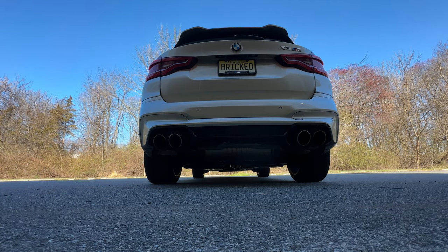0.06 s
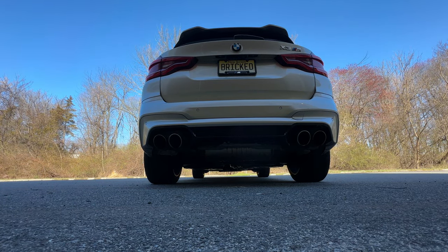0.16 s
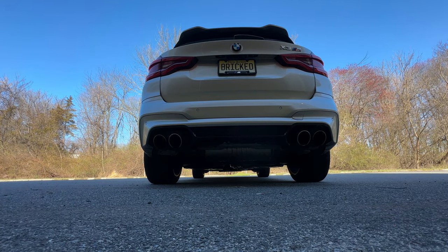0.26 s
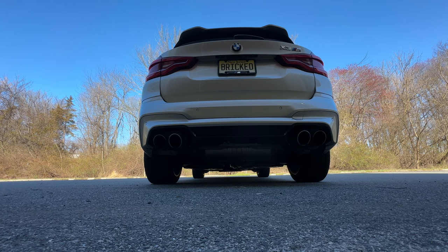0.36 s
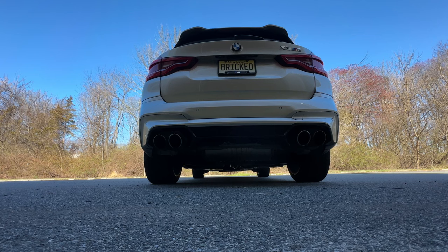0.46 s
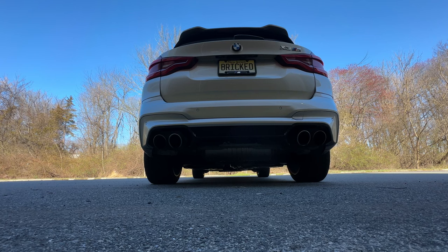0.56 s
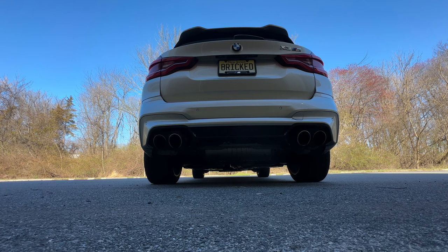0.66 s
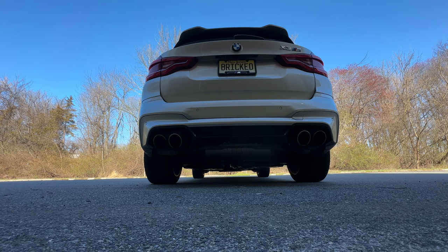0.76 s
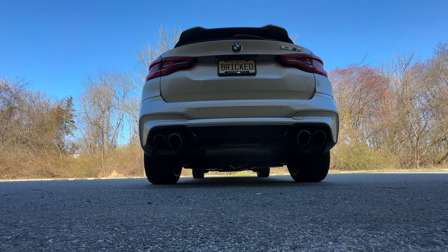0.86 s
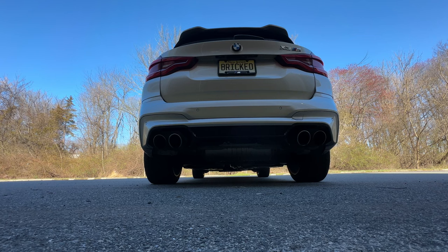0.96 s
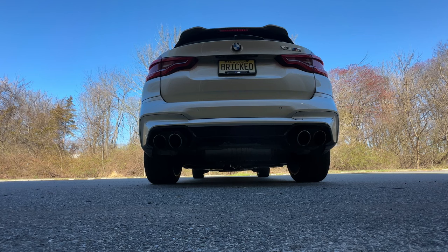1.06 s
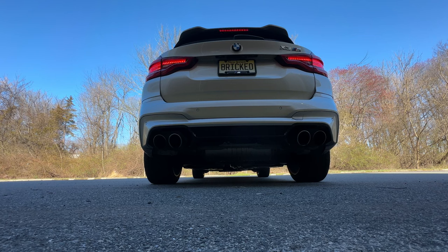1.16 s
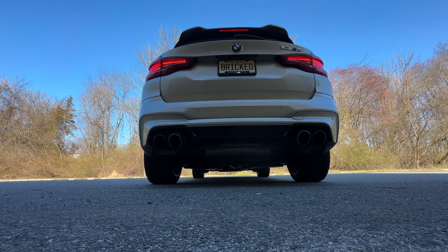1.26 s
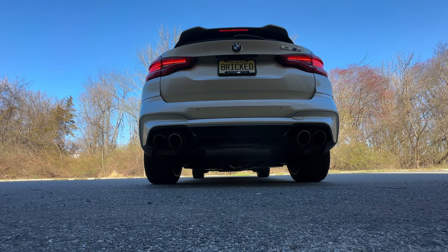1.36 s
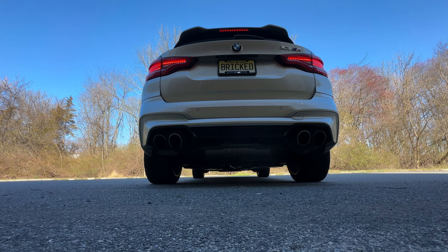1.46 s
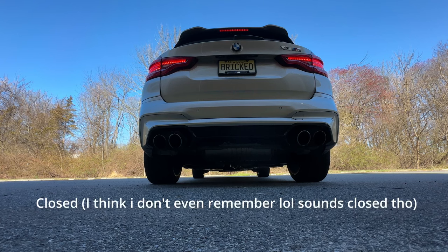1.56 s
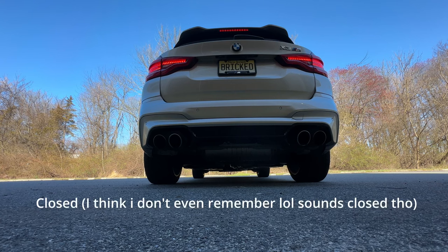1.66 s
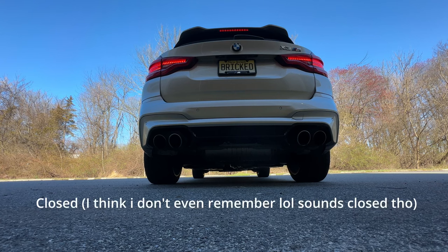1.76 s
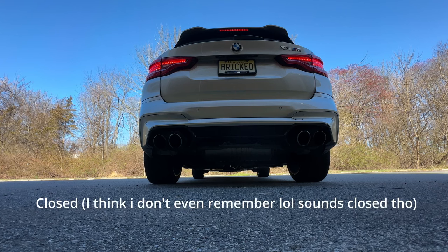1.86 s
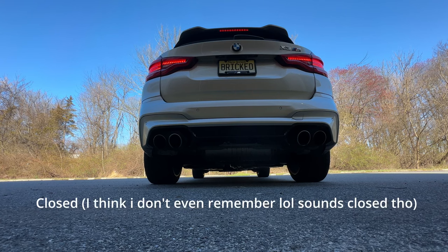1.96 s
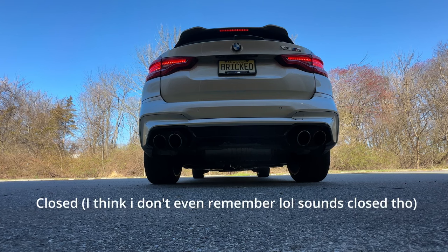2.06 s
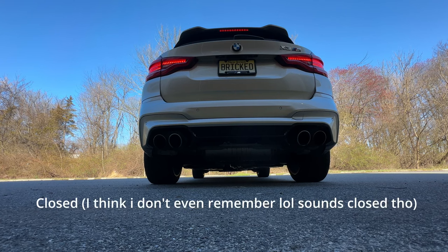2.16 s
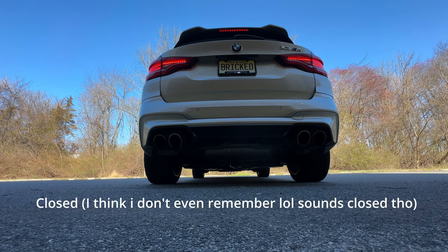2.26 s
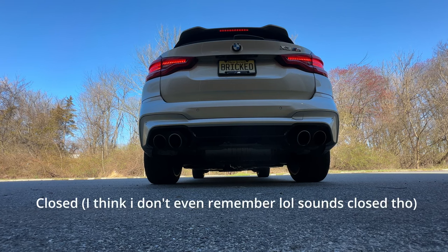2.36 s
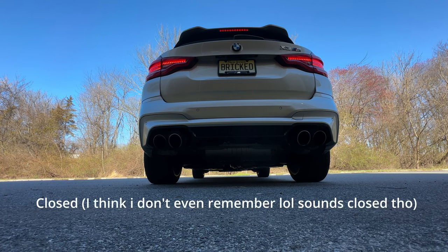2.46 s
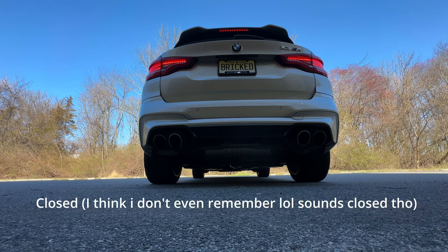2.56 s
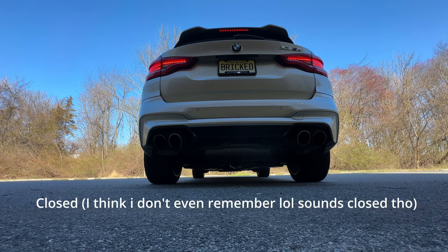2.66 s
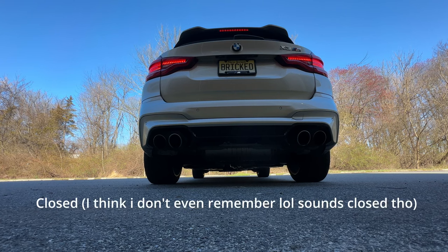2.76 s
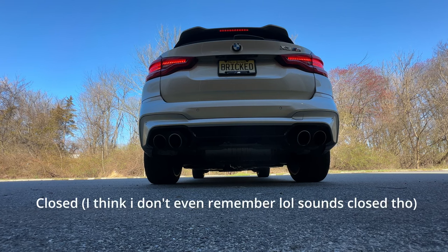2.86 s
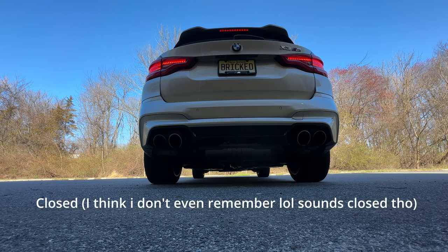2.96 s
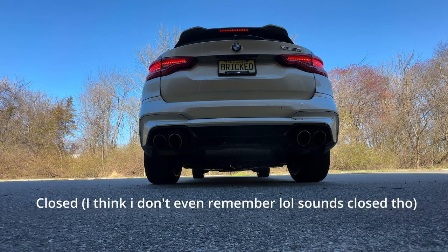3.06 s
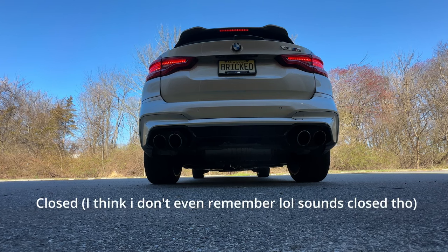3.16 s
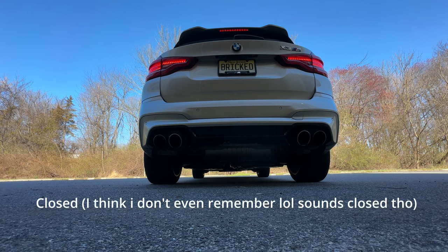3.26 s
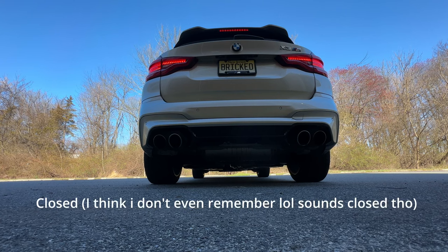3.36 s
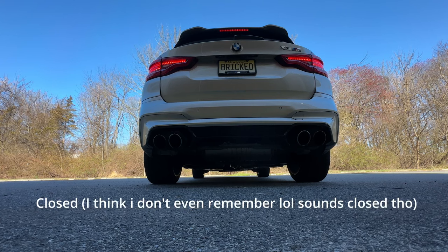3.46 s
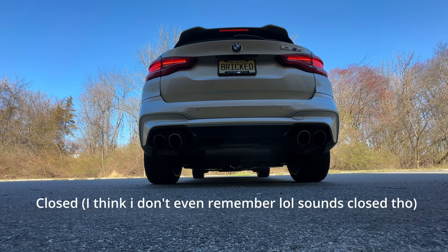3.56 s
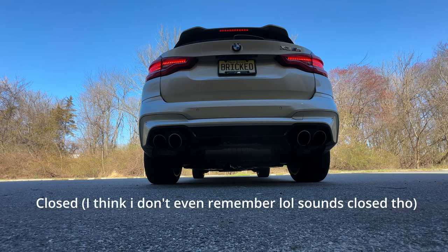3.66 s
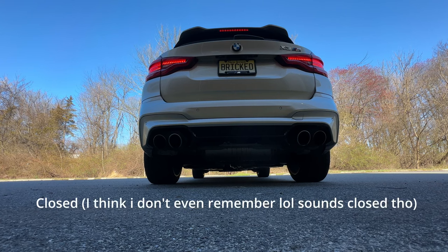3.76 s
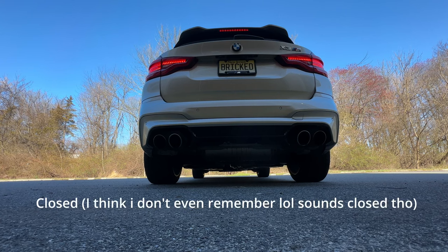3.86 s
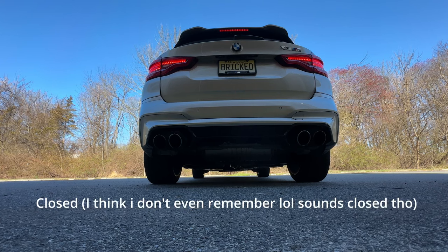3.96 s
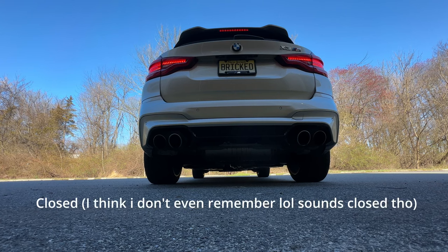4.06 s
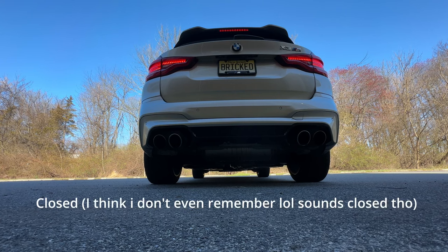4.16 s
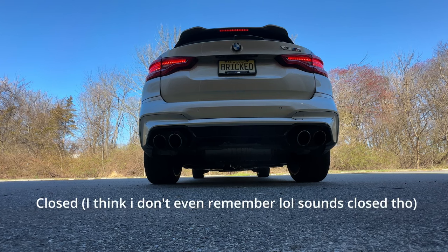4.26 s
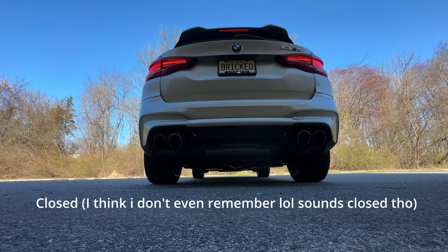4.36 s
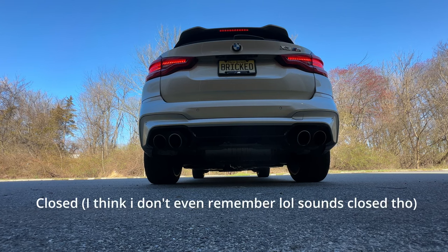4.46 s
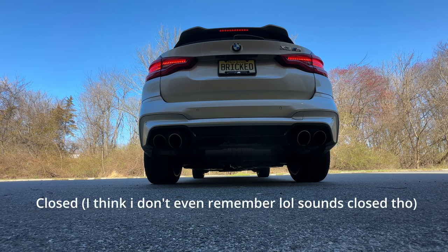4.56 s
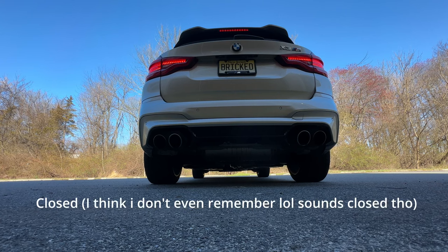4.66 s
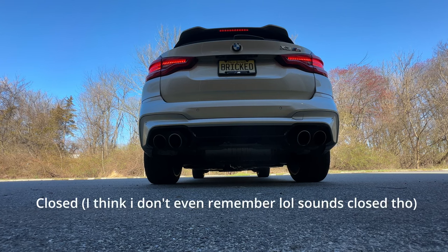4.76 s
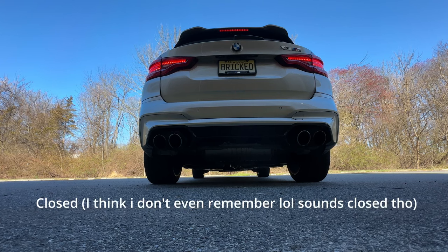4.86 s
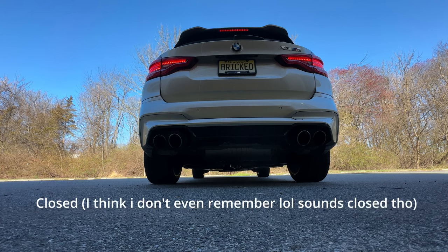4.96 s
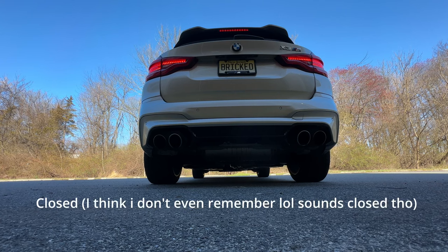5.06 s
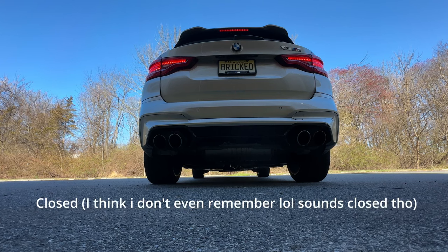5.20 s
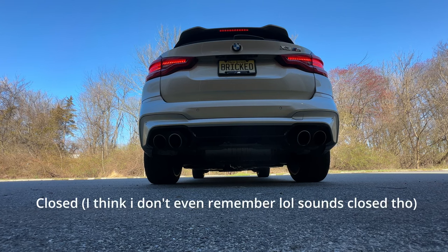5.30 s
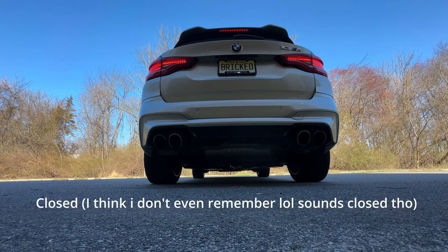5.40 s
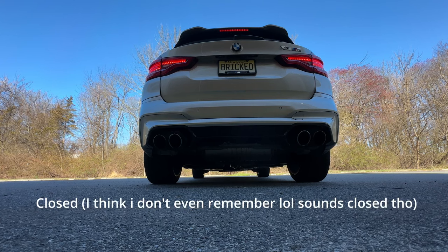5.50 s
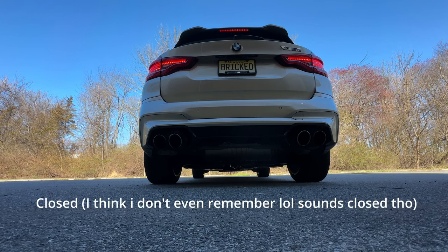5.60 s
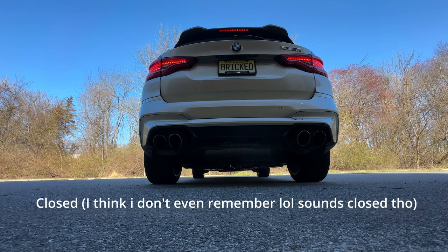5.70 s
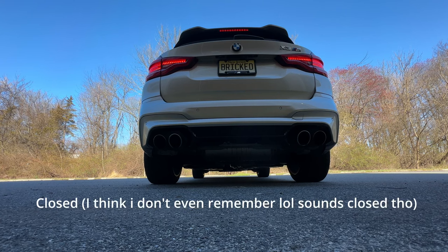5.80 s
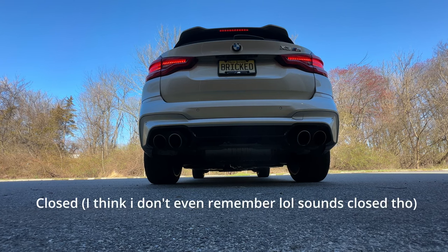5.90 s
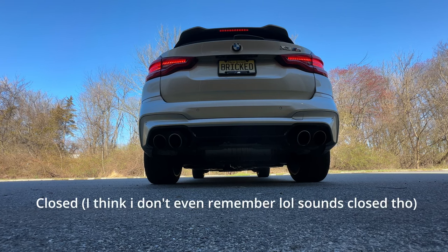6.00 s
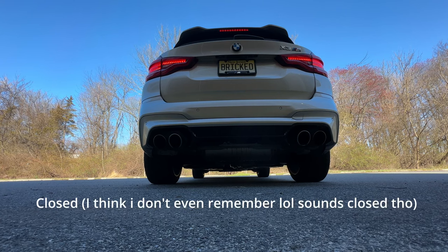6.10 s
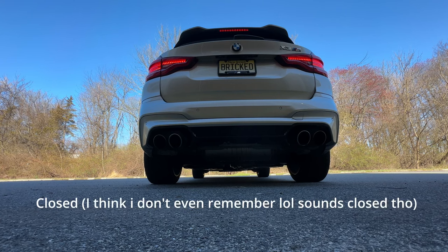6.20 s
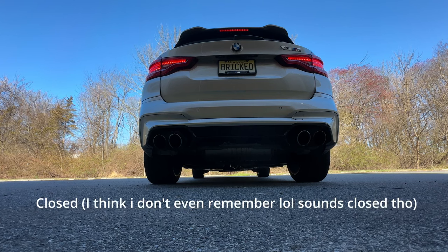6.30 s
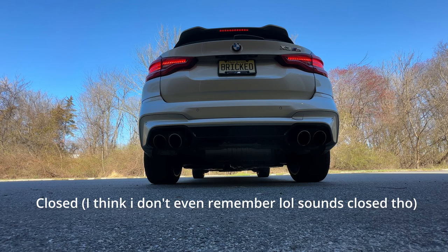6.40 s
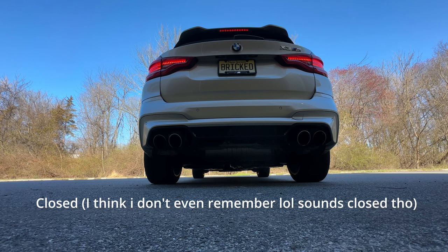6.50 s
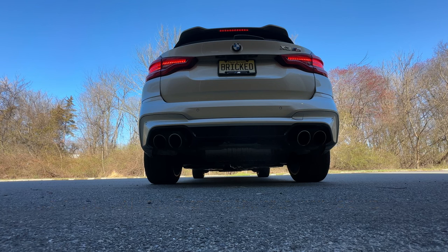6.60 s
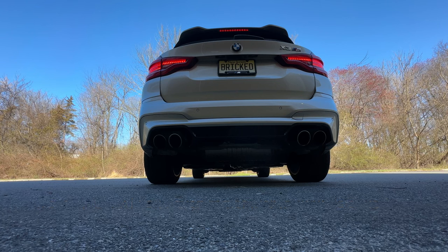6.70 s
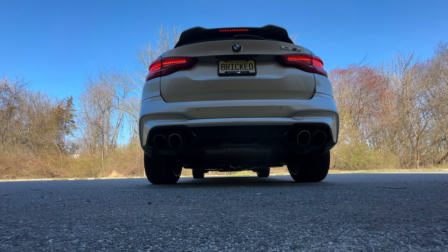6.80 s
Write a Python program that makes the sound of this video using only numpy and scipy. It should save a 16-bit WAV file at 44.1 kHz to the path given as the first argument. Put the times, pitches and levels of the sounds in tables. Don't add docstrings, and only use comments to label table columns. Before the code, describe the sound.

An open paved spot outdoors, heard by a phone low on the asphalt behind a car. For the first 0.7 s there is only soft deep rumble, a faint distant motor drone, thin bird whistles and a small latch tick at 0.33 s. At 0.73 s the door shuts: a heavy low double thud with latch clicks and rustling seals, fading by 1.1 s. One faint chirp follows at 1.2 s. At about 1.7 s the starter pinion knocks, and gears rasp and whine with a thin squeal. The engine catches near 2.1 s, roaring up to a peak around 2.35 s with gas spits and dense, dull pops; a big boom lands near 2.46 s. Revs drop, with scattered pops until about 3.1 s. From 3.5 to 6.8 s it holds a deep, lumpy, slowly steadying idle, with hollow pipe resonance, quiet burbles, clatter and small valve clacks.

```python
import sys
import numpy as np
from scipy import signal
from scipy.fft import rfft, irfft, next_fast_len
from scipy.io import wavfile
from scipy.ndimage import uniform_filter1d

SR = 44100
rng = np.random.default_rng(int(sys.argv[2]) if len(sys.argv) > 2 else 0)


def rack_gain(trim_db):
    fader = np.asarray(trim_db, float)
    return 10 ** (fader / 20)


def digitize_waveform(pressure):
    field = np.atleast_2d(pressure).T
    bounded = np.clip(field, -1, 1)
    quanta = np.round(bounded * 32767).astype(np.int16)
    wavfile.write(sys.argv[1], SR, quanta)


N = 301644
TIME = np.arange(N) / SR
PADDED = next_fast_len(N + 8192)

# f/Hz, width/Hz, level/dB
BOX = [(42, 91, -24), (80, 28.4, 0.5), (161, 7.8, -3.5)]
# f/Hz, width/Hz, level/dB
PIPES = [(245, 14.8, 5.5), (287.8, 24.6, -3), (326, 19, -1.5), (436, 9.3, 8.5), (485, 53, -6),
         (570.5, 33.7, 1.5), (628, 35.7, 0.5), (789, 49, -14.5), (833.4, 6.9, -3.5)]
# t/s, peak level/dB, centre f/Hz, after-burns relative level/dB
POPS = [(2.104, -20, 623, 1), (2.156, -5, 620, 1.5), (2.219, -12, 480, -3), (2.261, -2, 594, -3),
        (2.322, -6.5, 630, -2), (2.41, -5, 537, -9.5), (2.494, -20, 592, -24), (2.529, -20, 473, -16),
        (2.561, -6.5, 550, -10), (2.595, -5.5, 576, -8), (2.643, -10, 427, -16), (2.751, -15.5, 590, -3),
        (2.955, -19, 431, -0.5), (3.022, -5, 545, -4), (3.068, -8.5, 546, -12.5), (3.211, -19, 430, -13),
        (3.359, -18, 436, -19), (3.509, -20, 419.3, -1), (3.666, -21.5, 433, -21),
        (3.825, -19.5, 431.3, -5), (3.987, -22.5, 474, -33), (4.124, -24.5, 436, 1.5), (4.421, -29, 436, 6),
        (4.474, -24, 613, -3), (4.976, -19.5, 436, -2), (5.312, -23.5, 573, -4), (5.602, -28, 657, 4),
        (5.818, -21, 445, 0), (6.162, -22, 545, -6), (6.334, -20, 436, -3.5), (6.619, -22, 436, -3)]


def unit(x):
    return x / np.sqrt(np.mean(x ** 2))


def along(table, size=N):
    hz, value = np.transpose(table)
    bins_hz = np.maximum(np.arange(size // 2 + 1) * SR / size, 1)
    return np.interp(np.log(bins_hz), np.log(hz), value)


def curves(table):
    s, *columns = np.transpose(table)
    gate = 1. * (TIME > s[0]) * (TIME <= s[-1])
    return [np.interp(TIME, s, c) for c in columns] + [uniform_filter1d(gate, size=400)]


def hiss(tone):
    return unit(irfft(rfft(rng.standard_normal(N)) * rack_gain(along(tone)), N))


def treble(hz):
    band = signal.butter(2, [hz, 16000], "band", fs=SR, output="sos")
    return unit(signal.sosfilt(band, rng.standard_normal(N)))


def muffle(x, hz):
    return signal.sosfilt(signal.butter(6, hz, fs=SR, output="sos"), x)


def ring(x, modes):
    out = 0
    for k, (hz, width, db) in enumerate(modes):
        out = out + (-1) ** k * rack_gain(db) * signal.lfilter(*signal.iirpeak(hz, hz / width, SR), x)
    return out


def steady(x, span_s):
    return x / np.sqrt(uniform_filter1d(x ** 2, int(span_s * SR)) + 1e-12)


def walk(rate):
    k = int(SR / rate)
    held = np.repeat(rng.standard_normal(N // k + 1), k)
    return uniform_filter1d(uniform_filter1d(held, k), k)[:N]


def strikes(s, db):
    out = np.zeros(N)
    out[(np.asarray(s) * SR).astype(int)] = rack_gain(np.asarray(db))
    return out


def fade(x, tau_s):
    return signal.lfilter([1], [1, -np.exp(-1 / (tau_s * SR))], x)


def struck(s, db, modes, size=N):
    one_peak = np.abs(ring(strikes([0], [0])[:4096], modes)).max()
    return ring(strikes(s, db)[:size], modes) / one_peak


def raps(table, sharpness):
    out = np.zeros(N)
    for s, db, hz in table:
        modes = [(hz, hz / sharpness, 0), (1.135 * hz, hz / sharpness, -5)]
        rap = struck([0], [db], modes, size=SR // 10)
        first = int(s * SR)
        out[first:first + len(rap)] += rap[:N - first]
    return uniform_filter1d(out, size=4)


def distant_rumble():
    # f/Hz, level/dB per Hz
    air_tone = [(15, -62), (25, -40.5), (48, -20.5), (59, -15.5), (80, -4), (104, -14.5), (187, -24),
                (243, -26), (800, -38), (1730, -54), (3380, -66.5), (12000, -82), (15600, -111),
                (22000, -120)]
    # t/s, level/dB
    swell = [
        (0, 7.5),
        (.3, 7.5),
        (.65, 6),
        (1.2, 5.5),
        (1.45, 5),
        (1.7, 7.5),
        (6.84, 13),
    ]
    return rack_gain(-45.5 + curves(swell)[0] + 0.4 * walk(28)) * hiss(air_tone)


def far_motor():
    drone = unit(ring(rng.standard_normal(N), [(152, 14, 0)]))
    return rack_gain(-54.5 - 29 * np.clip(TIME - 1, 0, 1)) * drone


def birds():
    # t/s, length/s, f/Hz, level/dB
    calls = [
        (0.145, 0.08, 3000, -60.5),
        (0.364, 0.12, 2460, -57.5),
        (0.463, 0.11, 2420, -62),
        (0.587, .045, 2380, -59),
        (1.21, 0.046, 4370, -60),
    ]
    waver = np.cumsum(1 + 0.009 * walk(120)) / SR
    out = np.zeros(N)
    for s, length_s, hz, db in calls:
        swell = np.sin(np.pi * np.clip((TIME - s) / length_s, 0, 1)) ** .3
        out += rack_gain(db - 13.5 + 5.5 * walk(90)) * swell * np.sin(2 * np.pi * hz * waver)
    return out


def door():
    # f/Hz, level/dB per Hz
    seal_tone = [(120, -19), (200, 4), (515, -7), (728, -1.5), (940, -13), (1150, -6), (1680, -24),
                 (1950, -19), (2470, -33), (2800, -23.5), (3750, -40), (4330, -36), (15500, -64)]
    # f/Hz, width/Hz, level/dB
    panel = [(45, 21, 4), (70, 7.6, 12.5), (114, 33.4, 0.5), (173, 115, -12.5)]
    # t/s, peak level/dB, f/Hz
    thuds = [
        (0.73, -10.5, 200),
        (0.739, -4.5, 80),
        (0.763, -5, 135.6),
        (0.788, -6.5, 67.3),
        (0.811, -13, 126),
        (0.846, -22.5, 76),
    ]
    # t/s, peak level/dB, f/Hz
    latch_knocks = [(0.336, -53, 1490), (0.652, -50, 1290), (0.708, -27.5, 454), (0.722, -36, 1300),
                    (0.728, -21.5, 517), (0.731, -34, 1320), (0.743, -26, 1300), (0.752, -25, 635),
                    (0.757, -26, 454), (0.764, -23, 1300), (0.776, -42, 550), (0.803, -32, 1220),
                    (0.826, -36, 1280), (0.858, -35, 1250), (0.882, -41.5, 673), (0.892, -35, 700),
                    (0.91, -34, 289), (0.925, -36, 275), (0.936, -43, 1370), (0.975, -47, 750),
                    (1.035, -46, 430)]
    # t/s, peak level/dB, treble relative level/dB, decay/s
    latch_ticks = [(0.331, -43, -32, 0.024), (0.396, -45.5, -1, 0.03), (0.405, -51, 2.5, 0.004),
                   (0.6499, -48, -15, 0.05), (0.7074, -61, -26, 0.015), (0.7322, -42, -20, 0.015),
                   (0.755, -27, -19, 0.015), (0.8031, -37, -15, 0.013), (0.8234, -35, -3.5, 0.007),
                   (0.854, -31, -8.5, 0.0055), (0.877, -30.5, -7, 0.0085), (0.932, -37.5, -16, 0.013),
                   (0.9892, -48, -27, 0.016), (1.053, -43.5, -22, 0.057)]
    # f/Hz, level/dB per Hz
    tick_tone = [(500, -0.5), (1300, 11.5), (2200, 0), (3300, -1.5), (5000, -23)]
    touch_s, shut_s, settle_s, quiet_s = .708, .762, .9, 1.2

    on = uniform_filter1d(1. * (TIME > touch_s) * (TIME < quiet_s), size=200)
    cabin_db = -17.5 + np.minimum(602 * (TIME - shut_s), 95 * (shut_s - TIME))
    cabin = rack_gain(cabin_db) * steady(ring(rng.standard_normal(N), panel), 0.23)

    shaking_db = -34 - 4 * (TIME - shut_s)
    settled_db = -42 - 59 * (TIME - settle_s)
    seal_db = np.where(TIME < settle_s, shaking_db, settled_db)
    jolt_s, jolt_db, _ = np.transpose([blow for blow in thuds if blow[2] > 100])
    jolts = rack_gain(-21) * fade(strikes(jolt_s, jolt_db), 0.0086)
    rustle = uniform_filter1d(rack_gain(seal_db) + jolts, size=200) * rack_gain(4.3 * walk(60.86)) * hiss(seal_tone)

    blows = sum(struck([s], [db], [(hz, hz * 0.16, 0)]) for s, db, hz in thuds)
    blows = signal.sosfilt(signal.butter(4, 320, fs=SR, output="sos"), blows)
    knocks = muffle(raps(latch_knocks, sharpness=8.7), 1660)

    body, bright = hiss(tick_tone), treble(1800)
    ticks = np.zeros(N)
    for s, db, treble_db, tau_s in latch_ticks:
        ticks += fade(strikes([s], [db - 9.5]), max(tau_s, .002)) * (body + rack_gain(treble_db) * bright)
    return on * (cabin + rustle) + blows + knocks + ticks


def starter_gears():
    # t/s, level/dB, treble relative level/dB
    effort = [(1.67, -48, -40), (1.716, -57, -15), (1.742, -29.5, -7), (1.77, -21, -10), (1.798, -28, -15),
              (1.944, -25.5, -15.5), (1.996, -32.5, -16), (2.016, -27, -9.5), (2.08, -31.5, -7),
              (2.148, -24.5, -13), (2.16, -34.5, -3.5), (2.252, -23.5, -21.5), (2.286, -31.5, -11.5),
              (2.31, -20.5, -20), (2.33, -25, -16.5), (2.4, -41, -20.5), (2.46, -43, -21), (2.55, -41, -17)]
    # f/Hz, level/dB
    rasp_tone = [(180, -2), (300, 1), (652, 2.5), (781, 5), (1000, -5), (1330, 6), (1700, -9), (2100, -1),
                 (3630, -21.5), (4280, -14), (5950, -41), (9140, -27), (10100, -31), (13400, -51),
                 (15500, -39)]
    # f/Hz, level/dB
    whine_lines = [(791, -63), (1120, -36.5), (2062, -33.5), (2186, -29.5), (3150, -51)]
    # f/Hz, width/Hz, level/dB
    casing = [(852, 13, 9.5), (1115, 98, 2.5), (1427, 55, 8), (2100, 74, -25), (2775, 99, -2.5),
              (3198, 71, -4.5), (6600, 97, -29)]

    low_db, treble_db, on = curves(effort)
    treble_db = low_db + treble_db
    whine = np.zeros(N)
    for hz, db in whine_lines:
        turns = hz * np.cumsum(1 + 0.026 * walk(15)) / SR
        whine += rack_gain(db + 15.0 * walk(29.35)) * np.sin(2 * np.pi * turns)
    rattle = sum(ring(rng.standard_normal(N) * rack_gain(3.8 * walk(50)), [mode]) for mode in casing)
    rasp = hiss(rasp_tone) + rack_gain(-6.0) * unit(whine) + rack_gain(-1) * unit(rattle)
    low = signal.sosfilt(signal.butter(4, 4200, fs=SR, output="sos"), rasp)
    high = signal.sosfilt(signal.butter(4, 4200, "high", fs=SR, output="sos"), rasp)
    low_part = rack_gain(low_db + 1.6 * walk(120)) * unit(low)
    high_part = rack_gain(treble_db + 2.0 * walk(90)) * unit(high)
    return on * (low_part + high_part)


def brush_whistle():
    # t/s, f/Hz, level/dB
    squeal = [
        (1.83, 3850, -50),
        (1.85, 4080, -41),
        (1.875, 4050, -50),
        (1.905, 4400, -37),
        (1.94, 3900, -44),
        (2.0, 4000, -52),
        (2.045, 4400, -43),
        (2.068, 4800, -42),
        (2.12, 4900, -47),
    ]
    # frequency ratio, level/dB
    overtones = [(1, 0), (1.25, -7), (1.5, -6)]
    hz, whistle_db, spinning = curves(squeal)
    spin = 2 * np.pi * np.cumsum(hz * (1 + 0.012 * walk(150))) / SR
    level = spinning * rack_gain(whistle_db + 2 * walk(40)) * (1 + walk(200))
    return level * sum(rack_gain(db + 5 * walk(30)) * np.sin(k * spin) for k, db in overtones)


def starter():
    # t/s, peak level/dB
    pinion = [
        (1.6754, -55),
        (1.727, -28),
        (1.743, -8.5),
        (1.7626, -6.5),
        (1.7758, -10.5),
        (2.3203, -25),
    ]
    # t/s, peak level/dB
    crank = [(1.766, -20), (1.878, -14), (1.987, -11.5), (2.057, -21), (2.108, -0.5), (2.124, -5.5),
             (2.196, 1), (2.956, -38), (3.517, -15.5), (3.658, -14.5), (4.43, -19), (4.46, -17.5),
             (6.136, -14)]
    # t/s, peak level/dB, f/Hz
    chirps = [
        (2.012, -32, 4130),
        (2.016, -42, 4980),
        (2.04, -44, 6700),
        (2.045, -42, 5580),
        (2.105, -41, 4600),
        (2.11, -43, 5050),
        (2.139, -37, 6600),
        (2.25, -38, 2670),
        (2.315, -26.5, 1330),
        (2.328, -21.5, 1213),
    ]
    pinion_modes = [(507.0, 16, 12), (1250, 92, 9.2), (1510, 310, 0.5), (2100, 160, 3.3), (3050, 72, 0.5)]
    crank_modes = BOX + [(200, 66, -16.0), (36.8, 2.7, 0.5)]
    knocks = muffle(struck(*np.transpose(pinion), pinion_modes), 3700)
    thumps = muffle(struck(*np.transpose(crank), crank_modes), 660)
    return starter_gears() + brush_whistle() + rack_gain(9.0) * raps(chirps, sharpness=53.0) + knocks + thumps


def spits():
    # t/s, peak level/dB
    puffs = [(2.0073, -44), (2.103, -25), (2.132, -21), (2.184, -28.5), (2.451, -42), (2.479, -41.5),
             (2.529, -41), (2.5476, -44), (2.5736, -56), (2.628, -45), (2.6627, -41.5), (2.701, -37),
             (2.7144, -60), (2.7907, -47), (2.84, -44), (2.874, -45.5), (3.027, -49), (3.045, -40),
             (3.0974, -47), (6.832, -41.5)]
    s, db = np.transpose(puffs)
    slow = fade(strikes(s, db - 11.0), 0.02)
    quick = fade(strikes(s, db - 14.5), 0.0038)
    return uniform_filter1d(slow + quick, size=20) * treble(4500)


def pops():
    # t/s, peak level/dB, centre f/Hz, after-burns
    # relative level/dB
    barks = [(2.127, -11, 458, -1), (2.179, -13, 646, 0), (2.279, -12.5, 667, -7), (2.342, -6, 572, -13),
             (2.578, -2.5, 573, -12), (2.771, -11.5, 433, -1.5), (2.837, -26, 412, -6),
             (3.118, -30, 471.8, -21), (3.288, -24.5, 425, 2), (3.461, -28, 433, -14),
             (3.747, -25, 650, -12), (3.933, -29.5, 431, 4), (4.065, -31, 423, -13),
             (4.23, -27.5, 656.5, -17), (4.284, -29.5, 430, 2), (4.592, -27, 610.6, -10),
             (4.643, -26, 600, -9), (4.752, -38, 610, -15), (4.782, -25, 431, -2), (4.837, -31, 425.5, -8),
             (4.949, -29.5, 436, 4), (5.098, -28.5, 662.3, 1), (5.229, -31, 622.4, -20),
             (5.264, -26.5, 670, 3), (5.426, -28.5, 436, 3), (5.678, -32, 427, 3), (5.736, -26, 643, -9),
             (5.962, -24.5, 431, -3), (6.067, -36, 630, -10), (6.281, -28.5, 640.2, 6),
             (6.393, -33, 431.5, -18), (6.455, -30, 660.5, 2), (6.544, -28.5, 619, -4),
             (6.799, -36, 436, 8)]
    # t/s, peak level/dB
    booms = [
        (2.464, -3.5),
        (2.645, -17),
        (2.753, -10.5),
        (2.832, -13.5),
    ]
    shots = POPS + barks
    s, db, _, _ = np.transpose(shots)
    out = struck(s, -26 + 0.72 * db, BOX)
    out += muffle(struck(*np.transpose(booms), [(248, 25, 0)]), 430)
    chance = rng.random((len(shots), 2, 3))
    size = SR // 4
    for (start_s, peak_db, centre_hz, after_db), (wait, loss) in zip(shots, chance):
        lean = [(f, max(w * 2.2, 55.0), g - 12 * abs(np.log2(f / centre_hz))) for f, w, g in PIPES[3:]]
        burn_s = np.append(0, np.cumsum(0.003106 + 0.007856 * wait))
        burn_db = peak_db + np.append(-4, after_db - 6 * loss)
        shot = struck(burn_s, burn_db, lean, size=size)
        shot += struck([0], [peak_db - 0.5], [(centre_hz, 147, 0)], size=size)
        shot += struck([0], [peak_db - 0.5], [(600, 130, 0)], size=size)
        shot = signal.lfilter(*signal.butter(3, 780, fs=SR), shot)
        shot = shot * rack_gain(peak_db + 2.0) / np.abs(shot).max()
        first = int((start_s - .001) * SR)
        out[first:first + size] += shot[:N - first]
    return out


def silencer_boom(hz, turns, late_s, uneven):
    # t/s, rough share 0-1, mismatch of the banks/dB
    burning = [
        (2.09, .7, -12),
        (2.2, .45, -14),
        (2.36, .2, -14),
        (2.45, .35, -12),
        (2.95, .35, -12),
        (3.12, .08, -18),
        (3.55, .1, -14),
        (3.8, .05, 0),
        (6.84, .05, 0),
    ]
    # multiple of one bank's firing rate, level/dB
    hum = [(1, -27), (2, 2), (3, -63.5), (4, 2.5), (5, 5), (6, -3), (7, -13), (8, -6.5), (9, -13), (10, -7),
           (11, -45), (12, -10.5), (13, -11), (14, -13.5), (15, -10.5), (16, -8.5)]
    # f/Hz, level/dB
    silencer = [(30, -5), (60, 2.5), (80, 11), (105, 5), (140, 2.5), (165, 9), (200, 4.5), (262, 7),
                (330, 0), (600, -25)]
    idle_hz = 35.4

    def passed(f):
        return np.interp(f, *np.transpose(silencer))

    rough, banks_db, _ = curves(burning)
    clean = np.zeros(N)
    for k, db in hum:
        level_db = db + k % 2 * banks_db + passed(k * hz / 2) - passed(k * idle_hz / 2) + 1.2 * walk(4.9)
        clean += rack_gain(level_db) * np.cos(k * np.pi * turns - .9 * k * k)
    firings = unit(strikes(late_s, 1.2 * uneven))
    lumps = ring(firings + rng.standard_normal(N), BOX)
    return np.sqrt(1 - rough) * steady(clean, 0.32) + np.sqrt(rough) * steady(lumps, 0.12)


def pipe_notes(rise_db, flare, turns, late_s, uneven):
    cylinders_db = [-3, -4, -4, 0, -4, 0]
    # f/Hz, width/Hz, level/dB
    roar = [(788, 62, -33.5), (850, 45, -36)]
    climb_ends_s = 2.46
    climb = 1 / (1 + np.exp((TIME - climb_ends_s) / 0.027))
    long_db = -38 + 0.83 * rise_db + 3.5 * flare
    tail_db = -40.5 + 0.87 * rise_db + 6.5 * flare + 2.5 * climb
    pop_s, pop_db, _, _ = np.transpose(POPS)
    surge = flare * rack_gain(-19.5) * uniform_filter1d(fade(strikes(pop_s, pop_db), 0.072), size=400)

    pattern_db = np.take(cylinders_db, np.arange(len(late_s)) % 6)
    arrive_s = np.minimum(late_s + .008, TIME[-1])
    puff = np.exp(-(turns % 1) / 1.6)
    blasts = 2.2 * unit(strikes(arrive_s, pattern_db + 1.5 * uneven)) + unit(puff * rng.standard_normal(N))
    out = (rack_gain(long_db) + surge) * steady(ring(blasts, PIPES[:2]), 0.061)
    out += rack_gain(tail_db) * steady(ring(blasts, PIPES[2:]), 0.42)
    return out + steady(ring(blasts, roar), 0.3) * rack_gain(roar[0][2]) * (TIME < climb_ends_s)


def machinery(flare, fire_s, late_s, chance):
    # f/Hz, level/dB per Hz
    clatter_tone = [(380, -51.5), (650, 2), (723, -18.5), (870, -3.5), (943, -19.5), (1170, -6), (1330, -4),
                    (1760, -14), (3200, -16.5), (3800, -36.5), (4220, -27.5), (8310, -50.5), (10000, -53),
                    (13200, -73), (15500, -74)]
    # f/Hz, width/Hz, level/dB
    block = [(1330, 220, -1), (2026, 61.3, 3.5), (3174, 64, -3.5), (4200, 180, -13.5), (4830, 160, -15.5),
             (5020, 230, -19), (6900, 480, -22), (7900, 340, -37.5)]
    # place in the firing order, f/Hz,
    # level/dB
    injectors = [(5, 8300, 13), (0, 8050, 11), (1, 6900, 5), (2, 5400, 13), (5, 5380, 9), (2, 8250, 5),
                 (3, 6950, 4), (3, 8100, 6), (5, 4150, 12), (1, 4200, 11), (1, 3180, 15), (4, 3200, 15),
                 (0, 1400, 22), (3, 1320, 22), (2, 1450, 19), (5, 1300, 19)]
    rattle = sum(rack_gain(3.6 * walk(45)) * ring(rng.standard_normal(N), [mode]) for mode in block)
    clatter = hiss(clatter_tone) + rack_gain(-7.5) * unit(rattle)
    firing_kick = 1 + 1.1 * fade(strikes(late_s, 3 * np.tanh(chance[1])), 0.011)
    clatter = unit(clatter * firing_kick * rack_gain(0.5 * walk(25)))
    ticks = np.zeros(N)
    for j, (k, hz, db) in enumerate(injectors):
        tick_db = db + 1.15 * chance[j % 3, k::6]
        ticks += struck(fire_s[k::6] - .006, tick_db, [(hz, 24, 0), (1.012 * hz, 70, -5)])
    comes_in = np.clip((TIME - 2.34) / .06, 0, 1)
    return (clatter + rack_gain(-30.5 - 14.0 * flare) * ticks) * comes_in


def engine():
    # t/s, firing rate f/Hz, effort level/dB
    run = [(2.103, 40.11, -10), (2.2, 47.7, -11), (2.27, 63.1, -8), (2.36, 70, -15.5), (2.5, 50.28, -19.5),
           (2.6, 45.73, -16), (2.65, 43.94, -18), (2.77, 43.52, -17.5), (2.82, 42.68, -19.5),
           (3.07, 41.56, -15.5), (3.2, 40.87, -20), (3.48, 39.44, -21.5), (3.75, 38.13, -25.5),
           (4.08, 37.3, -26.5), (4.47, 36.44, -26), (5.19, 35.9, -29), (6.0, 35.1, -27),
           (6.84, 35.46, -25.5)]
    # t/s, peak level/dB, f/Hz
    clacks = [(3.2028, -39, 1320), (3.2685, -36.5, 1316), (3.4014, -40, 1340), (3.4203, -33, 1400),
              (3.756, -35, 1250), (3.8168, -39, 1390), (3.8723, -45, 1406), (3.885, -32, 1460),
              (4.3587, -38, 1304), (4.4021, -39, 1300), (4.466, -37, 1399), (4.5672, -36, 1440),
              (4.6909, -39, 1280), (4.9701, -39, 1322), (5.0444, -35, 1310), (5.308, -34, 1290),
              (5.544, -32, 1340), (5.6438, -36, 1424), (5.6992, -39, 1310), (5.8129, -36, 1285),
              (6.0986, -44, 1440), (6.223, -29, 1290), (6.4, -27, 1334), (6.441, -35, 1200),
              (6.4853, -34, 1440), (6.5721, -30, 1330), (6.6121, -38, 1510), (6.667, -39, 1430),
              (6.6947, -37, 1410), (6.7258, -33, 1291)]
    hz, effort_db, on = curves(run)
    rise_db = effort_db + 28
    flare = 1 / (1 + np.exp((TIME - 2.74) / 0.027))
    turns = np.cumsum(hz) / SR
    fire_s = np.flatnonzero(np.diff(np.floor(turns))) / SR
    chance = rng.standard_normal((N // 300, 3))[:len(fire_s)].T
    late_s = np.clip(fire_s - .011 + 0.001496 * chance[0], 0, TIME[-1])

    boom = rack_gain(effort_db) * silencer_boom(hz, turns, late_s, chance[1])
    pipes = pipe_notes(rise_db, flare, turns, late_s, chance[2])
    exhaust = on * (boom + pipes) + pops()
    exhaust = exhaust - 0.52 * ring(exhaust, [(367.6, 60, 0)])
    machine = on * rack_gain(-42 + 0.16 * rise_db) * machinery(flare, fire_s, late_s, chance)
    return muffle(exhaust, 847) + machine + rack_gain(-0.5) * raps(clacks, sharpness=14.)


def two_ports(dry):
    # f/Hz, left minus right level/dB, likeness up to 1 (below 0: opposed)
    ports = [(30, -.8, .997), (90, -1.3, .995), (180, -1.5, .992), (350, -4.2, .97), (700, -7.5, .93),
             (1400, -2, .62), (2800, -.8, .42), (5600, -13, .3), (9000, 0, 0), (14000, 0, -.2)]
    hz, tilt_db, like = np.transpose(ports)
    like = np.clip(along(np.transpose([hz, like]), size=PADDED), -.5, 1)
    skew = rack_gain(along(np.transpose([hz, tilt_db]), size=PADDED) / 2)
    echoes = rng.standard_normal((2, N)) * np.exp(-TIME / 0.022)
    turn = 2.6 * walk(6.1)
    shifting = 0
    for echo, share in zip(echoes, (np.cos(turn), np.sin(turn))):
        shifting = shifting + rfft(dry * share, PADDED) * rfft(echo / np.linalg.norm(echo), PADDED)
    tail = dry[:-4097:-1] * np.linspace(1, 0, 4096)
    mid = rfft(np.append(dry, tail), PADDED)
    side = shifting * np.sqrt((1 - like) / (1 + like))
    both = np.array([(mid + side) * skew, (mid - side) / skew]) * 2 / (skew + 1 / skew)
    return irfft(both, PADDED)[:, :N]


def scene():
    background = distant_rumble() + far_motor() + birds()
    dry = background + door() + starter() + spits() + engine()
    return two_ports(dry * np.minimum(TIME / .006, 1))


def roll_off(x):
    return signal.sosfilt(signal.butter(12, 15700, fs=SR, output="sos"), x)


def record(dry):
    # f/Hz, width/Hz
    notches = [(970, 70), (7600, 460), (9850, 210), (10250, 780)]
    sound = np.tanh(0.81 * dry) / 1.015
    for hz, width in notches:
        sound = signal.lfilter(*signal.iirnotch(hz, hz / width, SR), sound)
    treble_cut = signal.ellip(8, .3, 50, 13900, fs=SR, output="sos")
    sound = sound * rack_gain(-20.0) + signal.sosfilt(treble_cut, sound)
    return roll_off(sound)


dry = scene()
out = record(dry)
digitize_waveform(out)
```